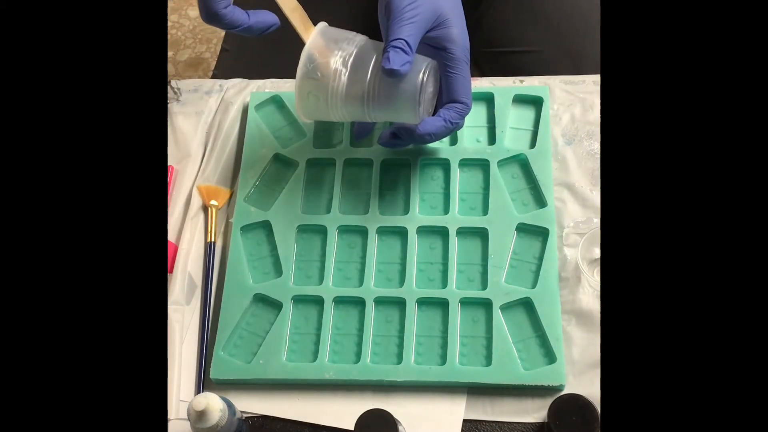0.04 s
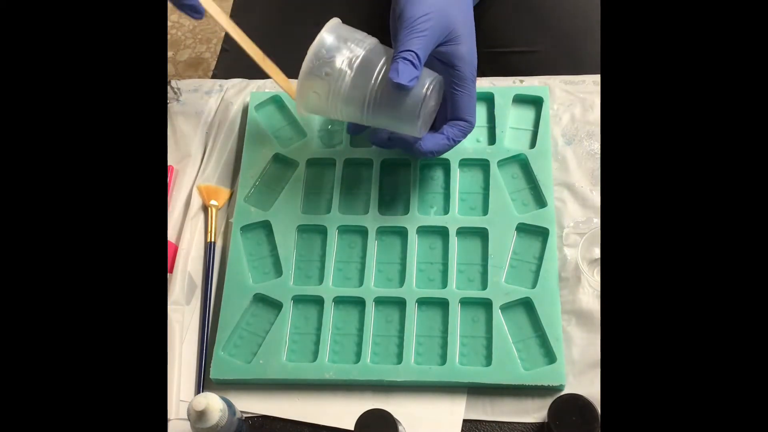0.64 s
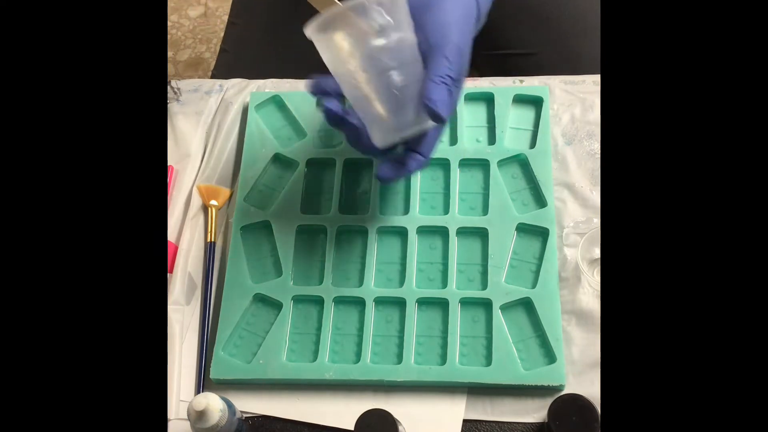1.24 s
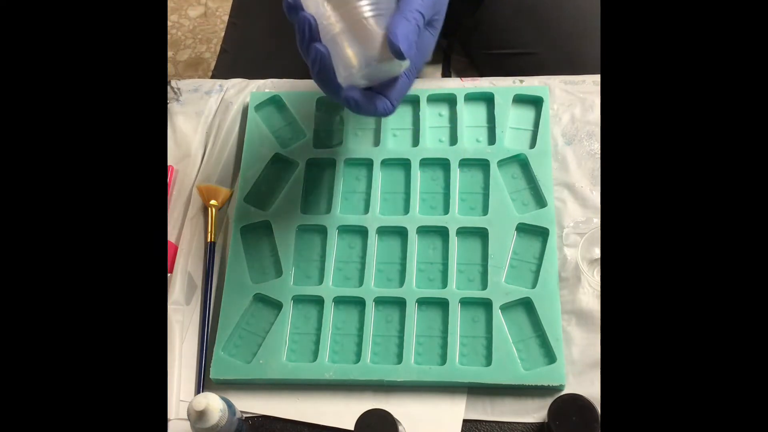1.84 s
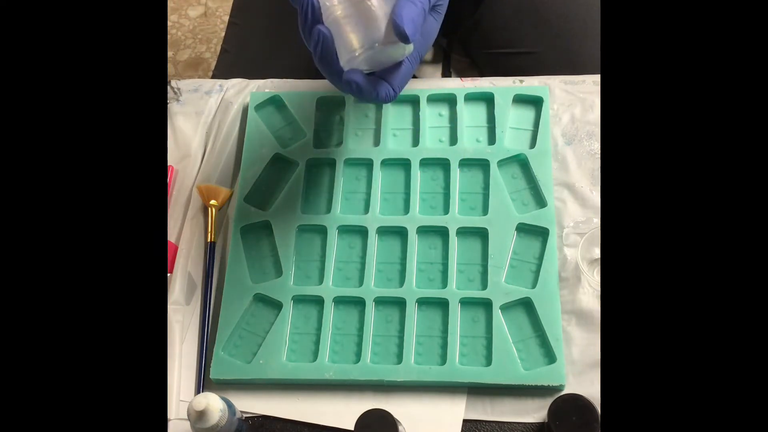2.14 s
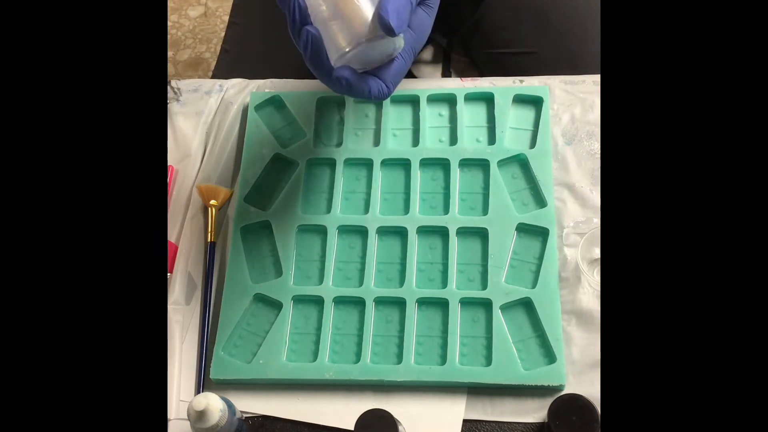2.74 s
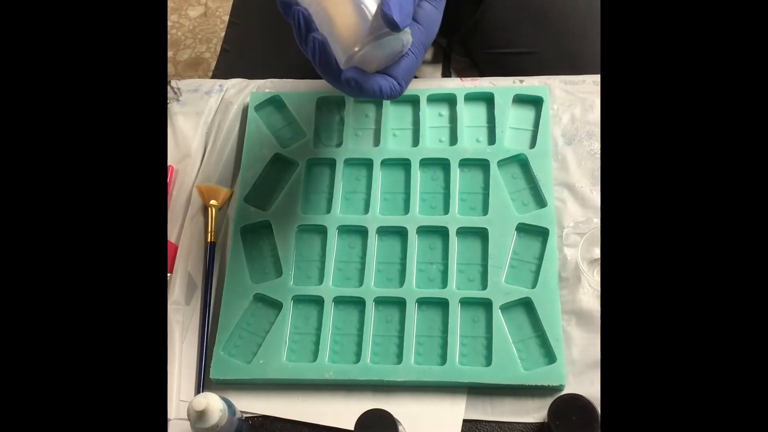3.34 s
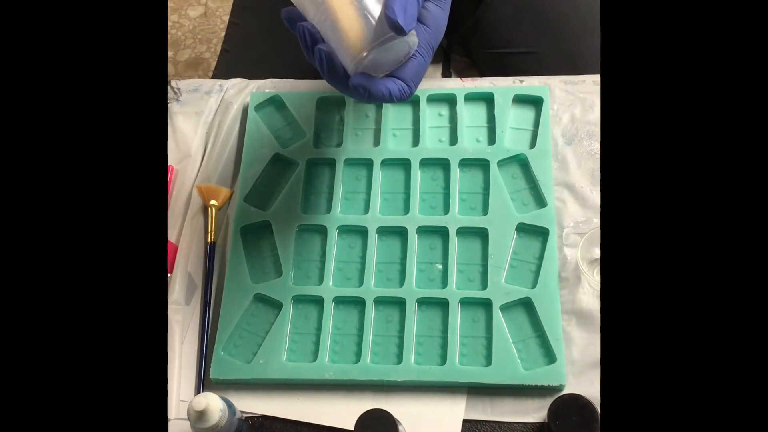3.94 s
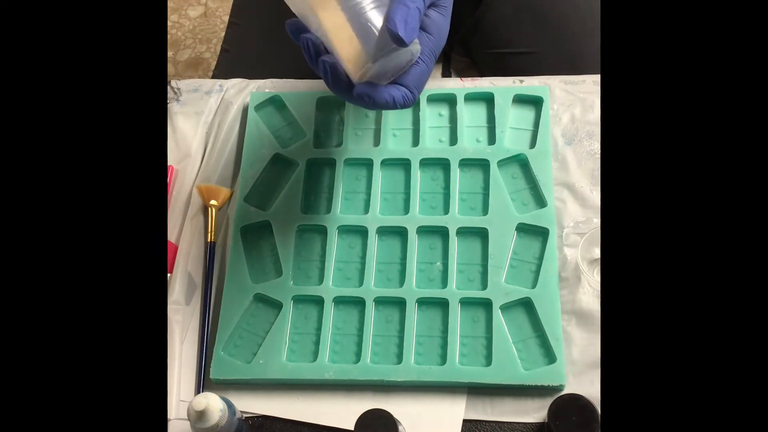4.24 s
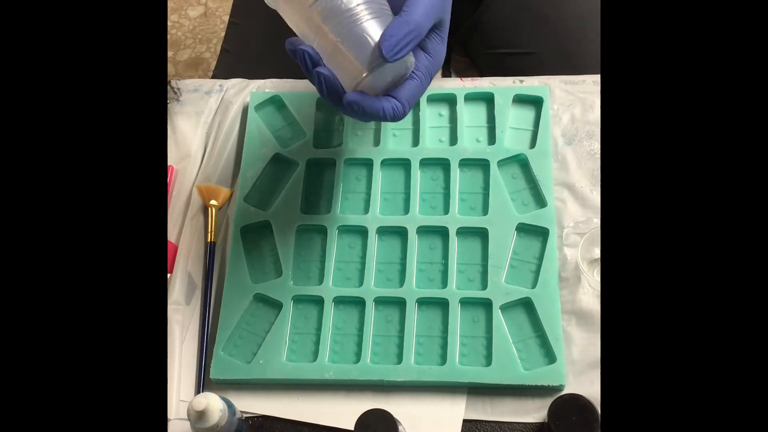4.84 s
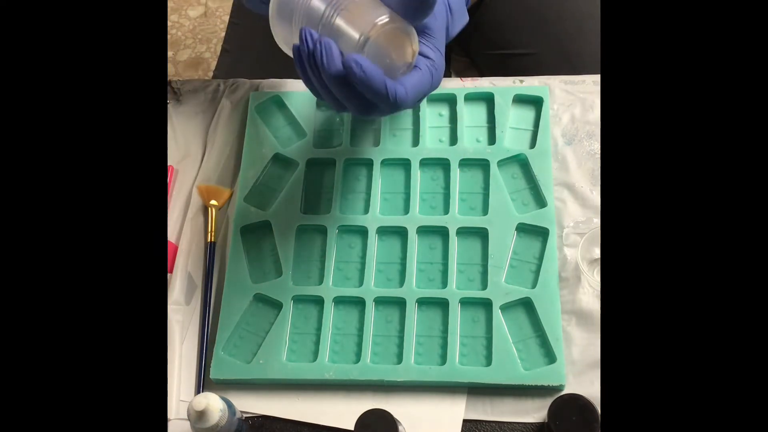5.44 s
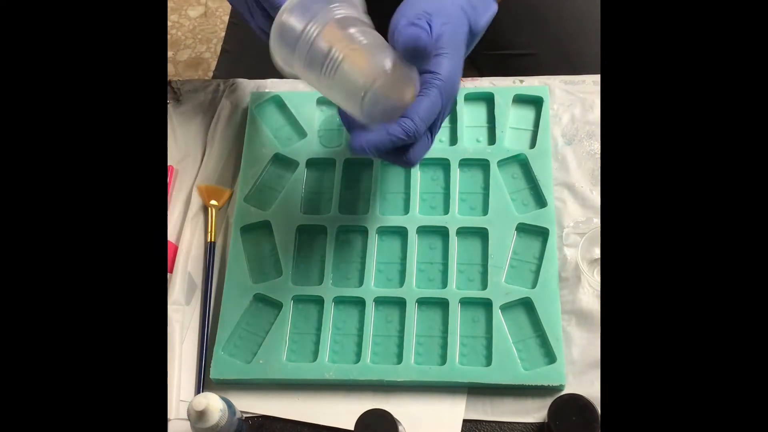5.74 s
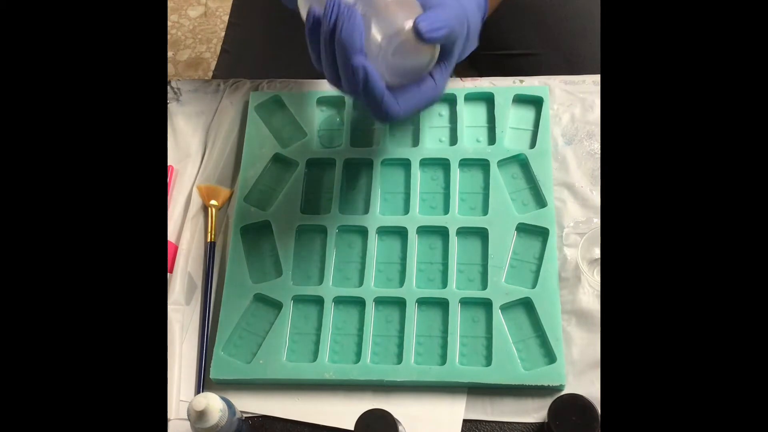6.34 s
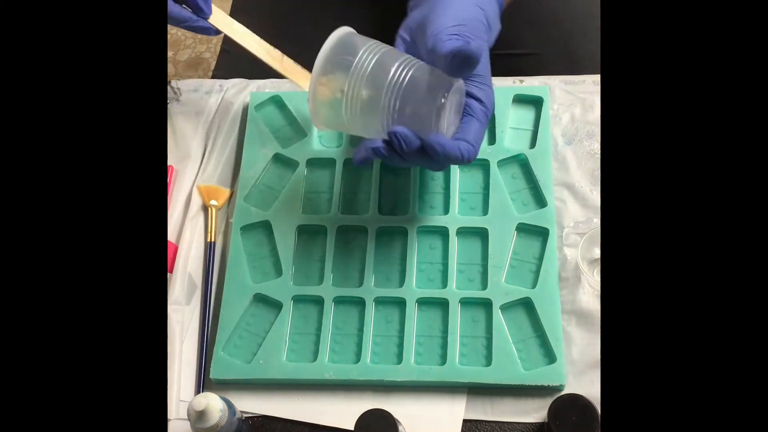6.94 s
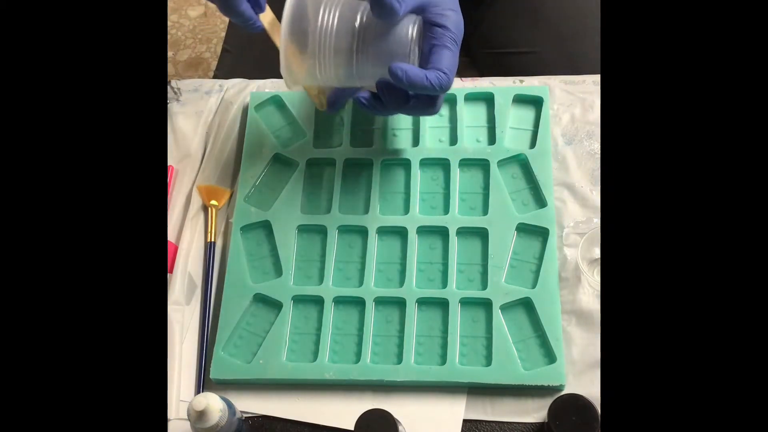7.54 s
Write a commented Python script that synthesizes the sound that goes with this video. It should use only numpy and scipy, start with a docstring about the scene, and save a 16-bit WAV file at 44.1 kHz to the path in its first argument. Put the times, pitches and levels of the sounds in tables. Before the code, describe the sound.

Close to the microphone, a wooden stick scrapes out a thin plastic cup with light, irregular taps, each leaving a brief hollow ring. The cup wall buckles a few times, twice with a loud snap. A rubber glove rustles and crackles faintly against the plastic, most noticeably as the taps thin out near the end. A low, gently throbbing motor hum fills the small room throughout.

```python
"""Scraping out a plastic cup

Close to the microphone, a wooden stick scrapes thick liquid out of a thin plastic cup, held in a
gloved hand over a mould. The stick taps the wall, which rings briefly near 1 kHz and a few times
buckles with a loud snap. The glove rustles on the cup; motors hum all round the small room."""
import sys
import numpy as np
from scipy import signal
from scipy.fft import rfft, irfft, next_fast_len
from scipy.io import wavfile
from scipy.ndimage import uniform_filter1d, map_coordinates

SR = 44100
rng = np.random.default_rng(int(sys.argv[2]) if len(sys.argv) > 2 else 0)


def master(y):
    """Save y as 16-bit WAV."""
    cut = np.clip(np.atleast_2d(y).T, -1, 1)
    pcm = np.round(cut * 32767)  # scale
    wavfile.write(sys.argv[1], SR, pcm.astype(np.int16))


N = 339129
TIME = np.arange(N) / SR


def stick_taps():
    """The contact point favours the modes near one pitch; a harder contact gives a brighter click."""
    # stick on cup: (time [s], ring [dB], favoured pitch [Hz], click [dB], hardness [dB])
    taps = [(1.404, -40, 790, -68, -6.5), (1.624, -36, 865, -63, -9.5), (1.779, -45.5, 820, -78, -2),
            (1.791, -44, 880, -73, 0), (1.818, -44.5, 910, -67, 1), (1.948, -47.5, 780, -71, 1),
            (1.976, -49, 830, -76, -1), (2.004, -40, 1060, -60, 4), (2.212, -52, 1020, -68.5, 6),
            (2.558, -40, 910, -70, 3), (2.582, -46.5, 890, -59, 4), (2.735, -40.5, 940, -81, 4),
            (2.761, -35.5, 890, -60.5, 3), (2.916, -36.5, 980, -78, 4), (2.942, -36, 920, -60, 2),
            (3.087, -40, 750, -70, 1), (3.12, -36.5, 1140, -63.5, -10.5), (3.295, -32.5, 933, -63.5, -5.5),
            (3.457, -43.5, 890, -58.5, 5), (3.564, -52, 880, -74, -9.5), (3.631, -51, 1110, -67, 3),
            (4.0, -48, 910, -67.5, 0), (4.371, -40, 1250, -67, -5), (4.709, -42, 940, -60, -7.5),
            (4.884, -40, 970, -61, -6), (5.055, -52, 1060, -70, 8), (5.177, -54, 950, -69, 7),
            (5.327, -44, 1100, -68, -13.5), (5.649, -54, 900, -65.5, 0), (6.344, -42, 600, -72, 0)]
    # lowest modes of the cup: (frequency [Hz], t60 [s])
    cup_modes = [(480, 0.11), (835, 0.034), (985, 0.05), (1140, 0.028)]
    # crowded upper modes of the wall, in three groups from dull to bright: (frequency [Hz], level [dB])
    clack = [(600, 2), (1100, -11), (1450, 6), (1900, 0.5), (2600, -2), (3100, -5), (4500, -24),
             (9000, -50)]
    crack = [(1500, -27), (3000, 4), (3900, 9.5), (5000, 3), (6200, 0.5), (7500, -11.5), (12000, -56)]
    tick = [(3500, -24), (7000, 5), (9000, -2), (11000, 5), (13500, -10), (16000, 0.5)]
    falloff_db_per_octave, grip_detune = 24, 0.028
    out, t = np.zeros(N), np.arange(SR // 10) / SR
    for s, ring_db, favoured_hz, click_db, hardness_db in taps:
        shares = from_db([-falloff_db_per_octave * abs(np.log2(hz / favoured_hz)) for hz, _ in cup_modes])
        shares /= np.linalg.norm(shares)
        for k, ((hz, t60), share) in enumerate(zip(cup_modes, shares)):
            gripped_hz = hz * (1 + grip_detune * rng.normal())   # the grip shifts each mode
            mode = np.sin(2 * np.pi * gripped_hz * t + k * np.pi / 2)
            ring = unit_blow(mode * dying(t, t60, rise_s=0.0035))
            add(out, s, from_db(ring_db) * share * ring)
        # a hard contact trades clack for tick
        clack_db, tick_db = click_db + 8.5 - hardness_db, click_db - 8.5 + hardness_db
        add(out, s, from_db(clack_db) * upper_modes(clack, dying(t, t60=0.055, rise_s=0.00069)))
        add(out, s, from_db(click_db) * upper_modes(crack, dying(t, t60=0.035, rise_s=0.00072)))
        add(out, s, from_db(tick_db) * upper_modes(tick, dying(t, t60=0.033, rise_s=0.0008)))
    return out


def wall_snaps():
    """A crease flips with a sharp burst; the whole wall follows within two milliseconds and rings."""
    # each buckled shape has modes of its own: (time [s], burst level [dB], burst t60 [s],
    # modes (frequency [Hz], level [dB], t60 [s]), burst spectrum (frequency [Hz], level [dB]))
    snaps = [ (2.3922, -26.5, .022, [(774, -16, 0.063), (847, -9.5, 0.052), (1702, -17, 0.025),
             (2040, -29, 0.056), (2320, -28, 0.039), (2693, -20.5, 0.028)], [(600, -11), (1200, 8.5),
             (1450, -17), (2200, 3.5), (2800, 0.5), (3400, -5), (4260, -5.5), (4700, -8.5), (7000, -15),
             (11600, -31.5), (15500, -46)]), (4.1730, -26.5, 0.011, [(474, -30.5, 0.16), (930, -27, .04),
             (963, 5, 0.013), (1105, -0.5, 0.036), (1176, -18, 0.039)], [(700, -25), (1400, -3.5),
             (2060, -2.5), (2800, -4.5), (3800, -1.5), (5160, -7), (6200, 1), (7000, -10), (8800, -12.5),
             (11500, -7.5), (16000, -19)]), (4.3787, -46, 0.034, [(377, -33.5, .12), (455, -31.5, 0.11),
             (854, -18.5, 0.075), (1240, -22, 0.037)], [(400, 3), (1400, 5), (2200, -16), (6000, -43)]),
             (5.9715, -38, 0.03, [(366, -39, 0.12), (880, -26.5, 0.038), (1095, -29, 0.034),
             (2077, -25.5, 0.034), (2460, -25, 0.01), (2697, -25, 0.038)], [(600, 0), (1100, -1), (1500, 5),
             (1700, -9), (2500, 11.5), (3700, -12.5), (6200, -16), (12000, -55)])]
    out, t = np.zeros(N), np.arange(SR // 10) / SR
    for s, burst_db, flip_t60, modes, spectrum in snaps:
        flip = dying(t, flip_t60, rise_s=0.00052) + from_db(-11) * dying(t, t60=0.048, rise_s=0.0005)
        add(out, s, from_db(burst_db) * upper_modes(spectrum, flip))
        # neighbouring modes start in opposite directions, so the ring swells before it dies
        for k, (hz, db, t60) in enumerate(modes):
            ring = np.sin(2 * np.pi * hz * t) * dying(t, t60, rise_s=0.0017)
            add(out, s, (-1) ** k * from_db(db) * ring)
    return out


def upper_modes(spectrum, envelope):
    """So many modes start together that they ring as a short burst of noise."""
    burst = rng.standard_normal(len(envelope)) * envelope
    return unit_blow(with_colour(burst, spectrum, grain_hz=600))


def glove(grain_db, crackle_db, crackles_per_s, jerk_db, jerks_per_s):
    """Rubber slips over plastic in small uneven jerks and crackles as it lets go."""
    # how strongly the glove slides, most while the cup is turned back: (time [s], level [dB])
    rub = [(0, -88), (.7, -77), (1.4, -76), (2.3, -73.5), (3.3, -80), (4.3, -71.5), (4.8, -79), (5.35, -73),
           (5.7, -68.5), (5.93, -71.5), (6.1, -63.5), (6.17, -70), (6.4, -73), (6.7, -81), (7.5, -84),
           (7.61, -66), (7.69, -84)]
    # rustle of rubber on plastic: (frequency [Hz], level [dB])
    rustle = [(1000, -13), (3000, 5), (6500, 0.5), (9000, -5.5), (12500, -3), (16000, -11)]
    level_db = in_time(rub) + jerk_db * drift(jerks_per_s)
    slide = rms_one(noise(rustle) * from_db(grain_db * drift(120)))
    releases = (rng.random(N) < crackles_per_s / SR) * from_db(rng.uniform(-13, 0, N))
    tick = upper_modes(rustle, dying(np.arange(SR // 50) / SR, t60=0.0103, rise_s=0.0003))
    crackle = rms_one(signal.fftconvolve(releases, tick)[:N])
    return from_db(level_db) * rms_one(slide + from_db(crackle_db) * crackle)


def room(x, tail_db):
    """The small room returns two distinct echoes and a diffuse tail that dies sooner in the treble."""
    # early echoes from table and walls: (delay [s], level [dB])
    echoes = [(0.0192, -16.5), (0.034, -20)]
    # decay of the reverberation: (frequency [Hz], t60 [s])
    decay = [(200, 0.21), (1000, 0.28), (2500, 0.27), (6000, 0.27), (15000, 0.12)]
    # colour of the reverberation: (frequency [Hz], level [dB])
    colour = [(100, -10), (400, 5), (1000, -0.5), (1600, -6.5), (2500, 4), (3300, -1), (5300, 5),
              (6300, 0.5), (9000, 3.5), (14000, -2.5)]
    t, edges_hz = np.arange(SR // 2) / SR, np.geomspace(200, 16000, 9)
    tail = np.zeros(len(t))
    for low, high in zip(edges_hz, edges_hz[1:]):
        bandpass = signal.butter(2, [low, high], "band", fs=SR, output="sos")
        band = signal.sosfilt(bandpass, rng.standard_normal(len(t)))
        tail += band * dying(t, at_hz(decay, np.sqrt(low * high)), rise_s=0.0061)
    tail = with_colour(tail, colour, grain_hz=128)
    response = from_db(tail_db) * tail / np.linalg.norm(tail)
    soft = np.hanning(SR // 2500)   # cluttered surfaces send back little treble
    for delay_s, db in echoes:
        add(response, delay_s, from_db(db) * soft / soft.sum())
    return signal.fftconvolve(x, response)[:N]


def room_tone():
    """The bed behind the cup: a fan, a pump, their drones and the rush of air."""
    # partials of the two motors: (multiple of the shaft speed, level [dB])
    fan_partials = [(2, -50.5), (4, -56.5), (6, -60.5), (8, -59.5), (15, -63.5), (19, -93), (21, -68),
                    (26, -64.5)]
    pump_partials = [(2, -62.5), (3, -58), (5, -53), (6, -59.5), (7, -57.5)]
    # wavering tones in the hum: (frequency [Hz], width [Hz], level [dB])
    hum_tones = [(203, 1.2, -56), (239, 8.7, -67.5), (251, 8, -64.5), (359, 9, -67.5), (1646, 20, -69),
                 (5340, 250, -80), (7700, 80, -93), (10500, 770, -84), (11480, 80, -91)]
    # moving air in the room: (frequency [Hz], relative level [dB])
    air = [(25, -42), (40, -28), (55, -6.5), (90, -2.5), (140, -2), (220, -5), (310, -10), (700, -10.5),
           (1200, -18.5), (2700, -26.5), (5000, -37), (8000, -43.5), (13000, -51.5), (16000, -47)]
    fan = motor(turns_hz=29.47, partials=fan_partials, wander=0.001, flutter_db=1.84)
    pump = motor(turns_hz=25.9, partials=pump_partials, wander=0.00185, flutter_db=2.5)
    tones = sum(from_db(db) * wavering(hz, width_hz) for hz, width_hz, db in hum_tones)
    return fan + pump + drones() + tones + from_db(-48.5) * noise(air)


def motor(turns_hz, partials, wander, flutter_db):
    """Partials of a shaft whose speed wanders a little; each flutters in level."""
    turns = np.cumsum(turns_hz * (1 + wander * drift(1.485))) / SR
    out = np.zeros(N)
    for multiple, db in partials:
        amplitude = np.sqrt(2) * from_db(db + flutter_db * drift(2.967))
        out += amplitude * np.sin(2 * np.pi * (multiple * turns + rng.random()))
    return out


def drones():
    """Three strong low tones: the lowest fades, the middle one throbs slowly, the highest faster."""
    # slow rise and fall of each drone: (time [s], level [dB])
    low_levels = [(0, -40), (2, -43.5), (4.4, -48.5), (4.95, -63), (7.69, -58)]
    mid_levels = [(0, -49), (0.6, -45.5), (2.6, -46), (3.7, -55), (4.4, -46), (5.35, -49.7), (5.75, -58),
                  (6.3, -66), (6.75, -46.5), (7.69, -55.5)]
    high_levels = [(0, -46.5), (1.4, -53.5), (1.8, -47), (2.55, -49), (3.0, -51.5), (3.6, -50.5),
                   (4.2, -42), (4.5, -54.5), (4.75, -40.5), (5.6, -55), (6.45, -57.5), (6.85, -47),
                   (7.2, -45.5), (7.4, -58.5), (7.69, -47)]
    mid_db = in_time(mid_levels) + throb_db(beats_per_s=1.464, swell_at_s=0.5, depth=0.3)
    high_db = in_time(high_levels) + throb_db(beats_per_s=2.743, swell_at_s=0.31, depth=0.36)
    low = motor(turns_hz=89.8, partials=[(1, in_time(low_levels))], wander=0.002, flutter_db=1.0)
    mid = motor(turns_hz=103.6, partials=[(1, mid_db)], wander=0.0049, flutter_db=1.1)
    high = motor(turns_hz=177.5, partials=[(1, high_db)], wander=0.00505, flutter_db=1.0)
    return low + mid + high


def throb_db(beats_per_s, swell_at_s, depth):
    """Level of a tone that beats against a weaker one of nearly equal pitch."""
    neighbour = depth * np.exp(2j * np.pi * beats_per_s * (TIME - swell_at_s))
    return 20 * np.log10(np.abs(1 + neighbour))


def wavering(hz, width_hz):
    """A tone whose strength and phase wander; rms 1."""
    phase = 2 * np.pi * hz * TIME
    return rms_one(drift(2 * width_hz) * np.sin(phase) + drift(2 * width_hz) * np.cos(phase))


def noise(spectrum):
    """Random phases under a smooth spectrum; rms 1."""
    hz = np.fft.rfftfreq(next_fast_len(N) * 2, 1 / SR)
    bins = from_db(at_hz(spectrum, hz)) * np.exp(2j * np.pi * rng.random(len(hz)))
    return rms_one(irfft(bins)[:N])


def drift(changes_per_s):
    """A smooth random curve; rms 1."""
    knots = rng.standard_normal(4096)
    curve = map_coordinates(knots, [TIME[::16] * changes_per_s], order=3, mode="wrap")
    return rms_one(curve).repeat(16)[:N]


def with_colour(x, spectrum, grain_hz):
    """Give a short sound its broad colour, keeping detail finer than grain_hz, and fade it out."""
    bins, hz = rfft(x), np.fft.rfftfreq(len(x), 1 / SR)
    grain_bins = max(round(grain_hz / hz[1]), 1)
    flattened = bins / np.sqrt(uniform_filter1d(np.abs(bins) ** 2, grain_bins) + 1e-9)
    return irfft(flattened * from_db(at_hz(spectrum, hz)), len(x)) * np.linspace(1, 0, len(x))


def dying(t, t60, rise_s):
    """Quick rise, exponential decay."""
    return (1 - np.exp(-(t / rise_s) ** 2)) * from_db(-60 * t / t60)


def add(track, s, sound):
    """Lay a sound into a track at time s."""
    start = round(s * SR)
    track[start:start + len(sound)] += sound[:N - start]


def in_time(points):
    """One value per sample from (time, value) points."""
    return np.interp(TIME, *np.transpose(points))


def at_hz(points, hz):
    """Read (frequency, value) points on a log-frequency axis."""
    f, value = np.transpose(points)
    return np.interp(np.log(hz + 1e-9), np.log(f), value)


def unit_blow(x):
    """Scale a short sound to the energy of 20 ms at rms 1."""
    return x / np.sqrt(np.sum(x ** 2) / (SR / 50))


def rms_one(x):
    """Scale to unit rms."""
    return x / np.sqrt(np.mean(x ** 2) + 1e-20)


def from_db(db):
    """Decibels to gain."""
    return 10 ** (np.asarray(db) / 20)


def scene():
    """Cup and glove close to one microphone, the hum all round."""
    cup = stick_taps() + wall_snaps()
    cup += glove(grain_db=3.5, crackle_db=-5, crackles_per_s=62, jerk_db=2.2, jerks_per_s=12)
    return (cup + room(cup, tail_db=-8.5) + room_tone())[None]


def record(dry):
    """The top is cut steeply above 15.9 kHz."""
    return signal.sosfilt(signal.ellip(10, 0.1, 80, 15900, fs=SR, output="sos"), dry)


dry = scene()
out = record(dry)
master(out)
```